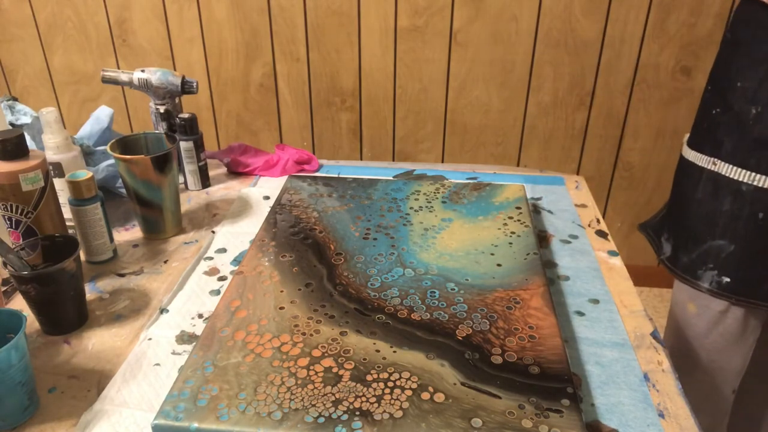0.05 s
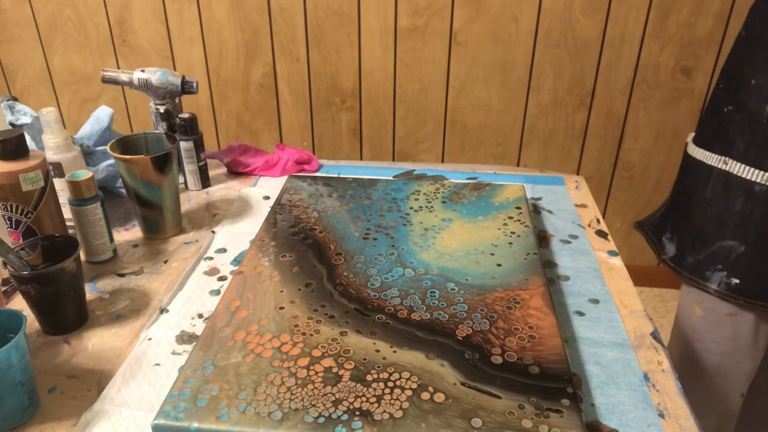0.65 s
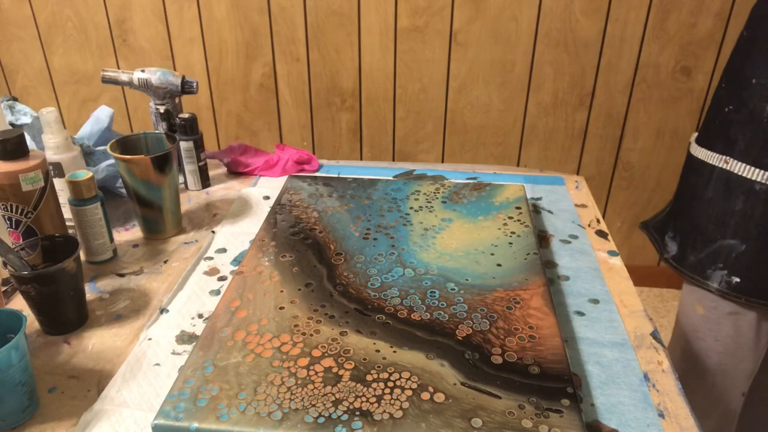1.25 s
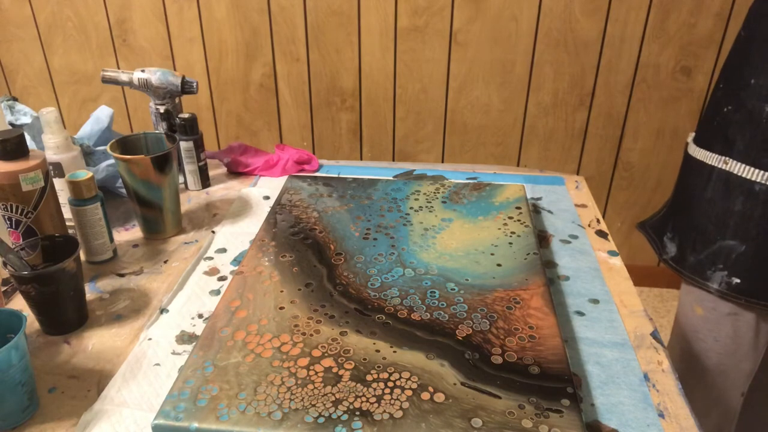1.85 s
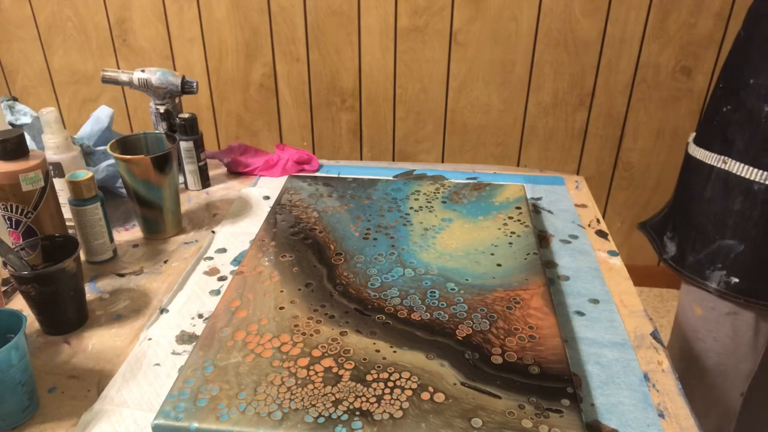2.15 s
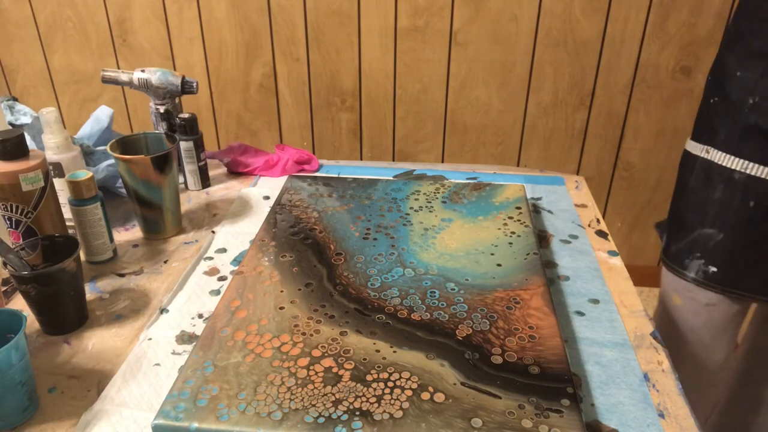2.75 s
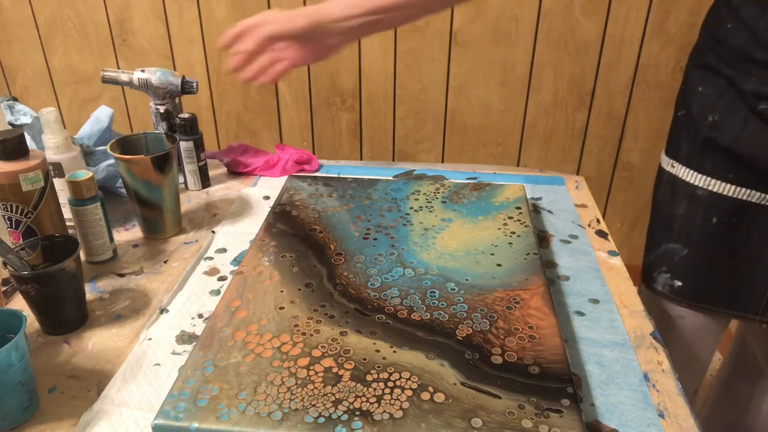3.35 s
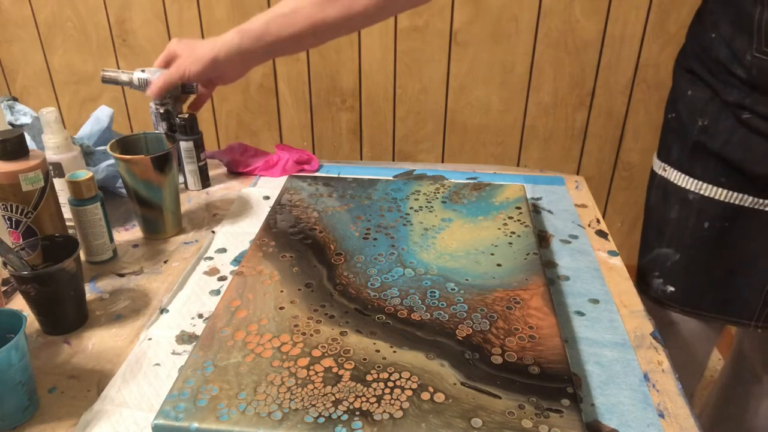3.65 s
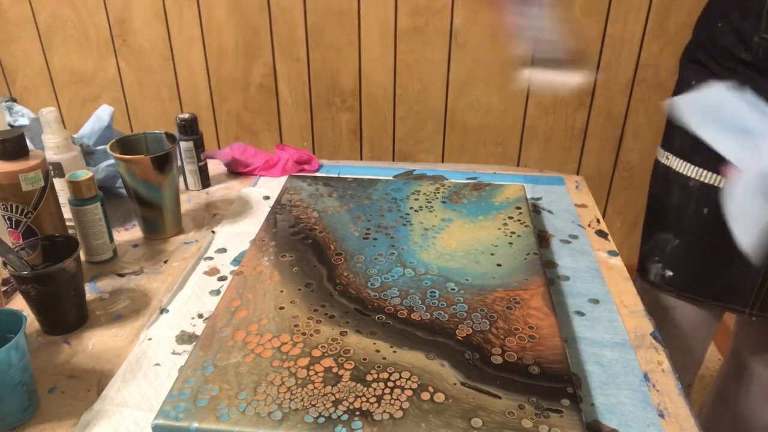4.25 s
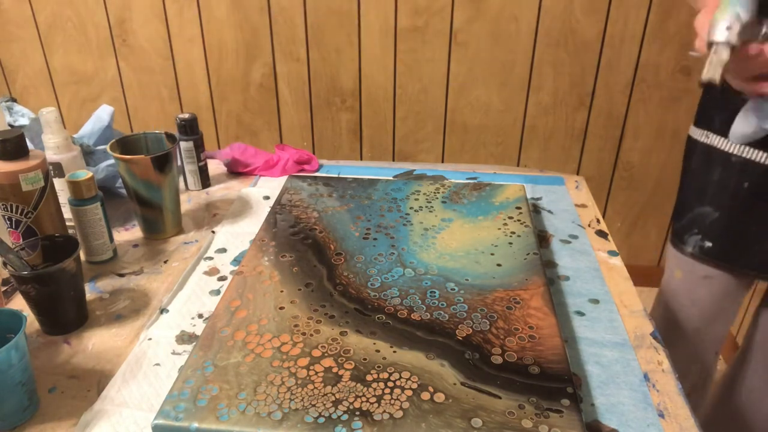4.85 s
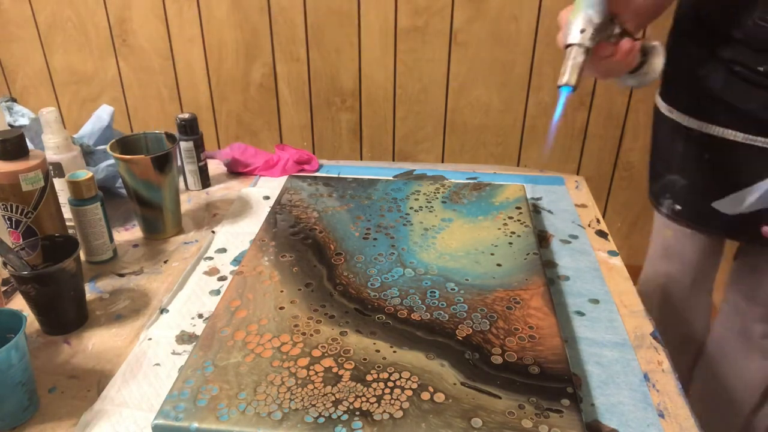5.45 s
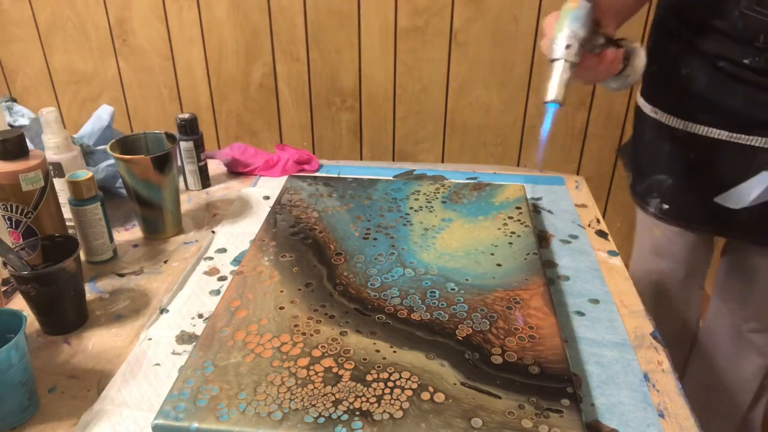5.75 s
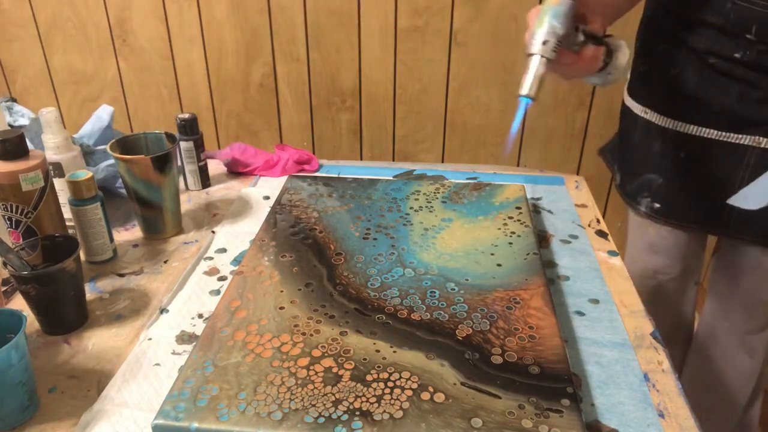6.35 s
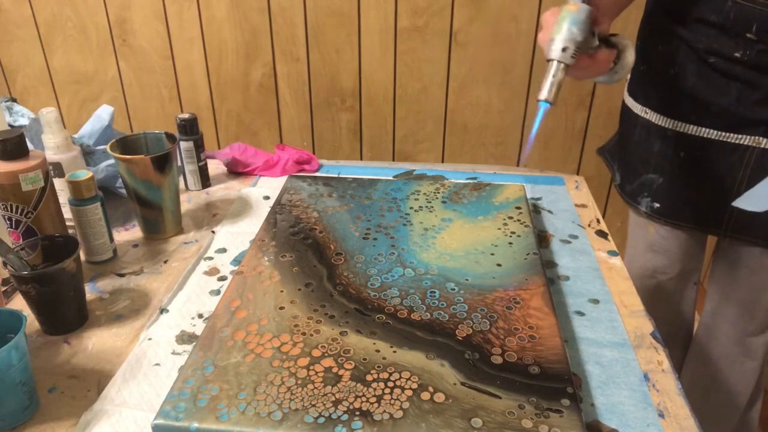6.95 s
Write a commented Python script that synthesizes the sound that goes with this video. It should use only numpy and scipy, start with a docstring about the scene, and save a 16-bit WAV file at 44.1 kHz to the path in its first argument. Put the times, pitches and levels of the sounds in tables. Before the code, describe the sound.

A gas torch lights with one sharp, very loud snap close to the microphone and keeps burning, a bright jet hiss over a low roar. Before that, the small workroom is quiet: hands are wiped on a cloth while a motor hums faintly, then come light knocks and a scrape as the torch is lifted, the click of its valve and a short hiss of unlit gas.

```python
"""A cloth swishes over hands in a small panelled workroom, with a motor humming underneath.
A butane torch is picked up with a scrape and light knocks. Its valve clicks open, cold gas hisses
through the nozzle, and the piezo igniter snaps hard enough to overload the microphone.
The flame catches and holds: a steady low roar of turbulent burning under a bright jet hiss,
whose treble shifts as the torch moves over the table."""
import sys
import numpy as np
from scipy import signal
from scipy.fft import rfft, irfft
from scipy.io import wavfile
from scipy.ndimage import uniform_filter1d

SR = 44100
rng = np.random.default_rng(int(sys.argv[2]) if len(sys.argv) > 2 else 0)


def dump(signal):
    """Clip the signal to [-1, 1] and save it as 16-bit WAV at the path in sys.argv[1]."""
    limited = np.clip(np.atleast_2d(signal).T, -1, 1)
    pcm = np.round(limited * 32767).astype(np.int16)
    wavfile.write(sys.argv[1], SR, pcm)


N = 312669
T, HZ = np.arange(N) / SR, np.fft.rfftfreq(N, 1 / SR)
LIT_S = 5.3867

# flame envelopes: (time [s], roar [dB], flame-front rasp before its trim [dB])
FLAME_LEVELS = [(5.5, -36, -45.5), (5.85, -34.5, -43.5), (6.2, -36, -46.5), (6.5, -37, -48),
                (6.8, -36, -46.5), (7.09, -35, -46.5)]
# turbulent combustion: (frequency [Hz], level [dB])
ROAR_SPECTRUM = [(50, -45), (110, -18), (240, -6), (290, 2), (500, -1), (1000, -1.5), (1140, -13.5),
                 (1500, -13.5), (2080, -15), (2300, -24.5), (3300, -23), (5000, -40)]
# peaks and notches that table and walls give the roar: (frequency [Hz], width [Hz], gain [dB])
ROAR_COLOUR = [(144, 42, 15.5), (561, 29, -16), (640, 45, 4), (752, 38, -5), (825, 53, 5), (1350, 51, -11),
               (1500, 90, 2.5), (3210, 110, 6)]
# bare jet noise: (frequency [Hz], level [dB])
JET_SPECTRUM = [(1200, 0.5), (2500, -4.5), (4000, -3.5), (9000, -2.5), (15800, -4.5)]
# nozzle resonances, lit and cold: (frequency [Hz], width [Hz], gain [dB])
HOT_NOZZLE_MODES = [(4830, 340, 8.5), (5340, 670, 10.5), (6360, 740, -1), (7670, 740, 7),
                    (10270, 1000, 5.5), (11900, 1140, -7), (13900, 1000, 10)]
COLD_NOZZLE_MODES = [(4580, 720, 22), (6150, 1300, 19), (10640, 600, 15.5), (11900, 900, -3),
                     (13800, 2200, 11)]
# top of the hiss as the nozzle swings on and off axis: (time [s], gain [dB])
NOZZLE_AIM = [(5.9, -2), (6.14, 1), (6.27, -5), (6.46, -8), (6.53, -1), (6.64, -.5), (6.72, -6.5),
              (6.96, -5.5), (7.08, -2)]
# phasing of the moving hiss: (time [s], signed comb depth [ratio])
COMB_DEPTH = [(5.6, .03), (6.0, 0.13), (6.3, -0.24), (6.6, 0.053), (7.09, 0.081)]
# igniter hammer and its rebounds: (time [s], level [dB], t60 [s], treble loss [dB/octave])
HAMMER_HITS = [(5.3869, 2, 0.019, -2), (5.3887, -3, 0.016, 5), (5.3909, -4.5, 0.022, -2)]
# bare impact: (frequency [Hz], level [dB])
IMPACT_SPECTRUM = [(40, -35), (130, -4), (400, -7.5), (900, -6.5), (2000, 1.5), (8000, 2), (11000, -1.5),
                   (16000, -2.5), (19000, -17)]
# heavily damped torch body: (frequency [Hz], width [Hz], gain [dB])
TORCH_MODES = [(1380, 400, 10), (2090, 720, 6), (2710, 340, 3.5), (3840, 1100, -5.5), (4630, 210, 8.5),
               (5200, 260, 5.5), (6300, 470, 4.5), (7090, 860, 12), (8230, 470, 6.5), (10100, 610, -3),
               (12840, 570, 11.5), (13800, 480, 19.5), (14700, 440, 10)]
# unlit gas: (time [s], valve seat hiss [dB], nozzle hiss [dB])
GAS_LEVELS = [(5.15, -57, -75), (5.2, -42.5, -54), (5.245, -39.5, -48), (5.29, -40, -43), (5.33, -49, -42),
              (5.39, -48, -41)]
# rasp at the valve seat: (frequency [Hz], level [dB])
SEAT_SPECTRUM = [(350, -37), (600, -10), (1170, -2), (2140, 0.5), (3020, 0), (3410, -3.5), (5140, -1),
                 (15800, -21)]
# the valve clicking open: (time [s], ring [dB], tick [dB])
OPENING_CLICKS = [(5.146, -38.5, -60), (5.155, -32, -29.5), (5.219, -55, -40)]
# resonance of the valve's tick: (frequency [Hz], width [Hz], gain [dB])
TICK_MODE = [(9400, 1000, 10)]
# scrape of the turning valve knob: (time [s], level [dB])
KNOB_LEVEL = [(4.93, -72), (5.01, -53.5), (5.06, -59), (5.12, -50.5), (5.16, -54), (5.2, -61)]
# fingers and table knocking the torch: (time [s], tick [dB], body [dB], body pitch [Hz], body t60 [s])
TORCH_KNOCKS = [(3.18, -66, -45, 400, .04), (3.782, -52, -46, 900, .02), (3.788, -51, -45, 3600, .014),
                (3.803, -48, -42.5, 1000, .017), (3.858, -53, -42, 3700, .008),
                (3.865, -45, -37.5, 3600, 0.0083), (4.376, -64, -47, 600, 0.069),
                (4.478, -50, -46, 5200, .06), (4.904, -40, -33, 2020, 0.035),
                (4.905, -48, -34.5, 3900, .018), (5.366, -63, -39, 450, 0.057)]
# cloth on the hands, later on the torch: (start [s], length [s], base level [dB], lightness [dB])
CLOTH_STROKES = [(0.035, 0.26, -49.5, -5.0), (0.28, 0.13, -46.5, -4.5), (0.4, 0.15, -54.5, -6),
                 (0.565, 0.16, -50, -6.0), (0.804, 0.17, -53.0, -4.5), (0.93, 0.16, -57.0, -5),
                 (1.128, 0.15, -51.5, -4.0), (1.285, 0.24, -48, -5.0), (1.522, 0.083, -55, -8),
                 (1.7, 0.17, -51.0, -4.5), (1.87, 0.24, -49.5, -3), (2.194, 0.2, -49, -3.0),
                 (2.339, 0.14, -47.5, -5.5), (2.535, 0.15, -46.0, -4.5), (2.7, 0.26, -49.5, -4.5),
                 (2.925, 0.3, -57.5, -6.5), (4.04, 0.32, -60.5, -4.5), (4.449, 0.21, -52, -6.5),
                 (4.7, 0.12, -56.5, -4.0), (4.83, 0.4, -52, -6.5)]
# swell in mid-stroke: (rub [dB], swish [dB], fizz [dB])
STROKE_SWELL = [0.3, 2, 0.5]
# sliding fibres: (frequency [Hz], level [dB])
CLOTH_SPECTRUM = [(150, -36), (300, -5.5), (660, -5), (1000, -3.5), (1200, -5), (1850, -2), (2400, -4.5),
                  (3600, -3.5), (4600, 0), (5600, -2.5), (7000, -6.5), (7700, -6.5), (11200, -12.5),
                  (15800, -12.5)]
# octave of the motor hum: (time [s], level [dB])
HUM_OCTAVE = [(0.1, -64.5), (0.72, -52), (1.12, -54.5), (1.6, -71), (2.2, -66), (2.32, -56.5), (3.1, -51.5),
              (3.45, -56.5), (4.48, -53.5), (4.85, -76)]
# still air of the room: (frequency [Hz], level [dB])
AIR_SPECTRUM = [(20, -36), (32, -17), (45, -10), (120, -11), (200, -9.5), (270, -9), (330, -13.5),
                (550, -17), (900, -21.5), (1500, -25.5), (4000, -32), (7800, -33), (9000, -38.5),
                (15800, -38)]
# low room resonances: (frequency [Hz], width [Hz], gain [dB])
AIR_MODES = [(54, 11, 9), (78, 8, 2), (108, 8, 0), (116, 8, 4.5), (145.4, 32, 8), (214.4, 14, 6.5),
             (235.4, 36, 2.5)]
# reverb decay: (frequency [Hz], t60 [s])
REVERB_T60 = [(150, 0.66), (1000, 0.75), (2500, 0.7), (7000, 0.54), (11000, 0.36), (16000, 0.41)]


def flame(rasp_trim_db=-1, hiss_db=-45, top_db=-50.5, catch_s=0.072, comb_delay_s=0.000478):
    """Turbulent burning roars low; the jet hisses through the hot nozzle, which beams its treble."""
    roar_db, rasp_db = curves(FLAME_LEVELS)
    aim_db, = curves(NOZZLE_AIM)
    flutter_db = 0.5 * wander(rate_hz=53)
    burning = noise(spectrum(ROAR_SPECTRUM) + resonances(ROAR_COLOUR))
    front = irfft(rfft(burning) * above(1190), N)
    roar = (burning - front) * amp(roar_db + flutter_db) * ramp(LIT_S, catch_s)
    rasp = ripple(front, depth_db=-3, drift_hz=0.13) * amp(rasp_db + rasp_trim_db + flutter_db)
    jet = noise(spectrum(JET_SPECTRUM) + resonances(HOT_NOZZLE_MODES))
    jet = ripple(jet, depth_db=-8, drift_hz=0.31)
    top = irfft(rfft(jet) * above(8360), N)
    hiss = rasp + unit(jet - top) * amp(hiss_db + 0.3 * aim_db) + unit(top) * amp(top_db + aim_db)
    phasing = curves(COMB_DEPTH)[0] * np.roll(hiss, round(comb_delay_s * SR))
    return (roar + hiss + phasing) * ramp(LIT_S, 0.027)


def igniter(pop_db=-27):
    """A sprung hammer hits the piezo crystal and rattles the torch; the gas catches with a soft pop."""
    direct, send = np.zeros(N), np.zeros(N)
    body = resonances(TORCH_MODES)
    for s, db, t60, treble_loss in HAMMER_HITS:
        blow = spectrum(IMPACT_SPECTRUM) - treble_loss * np.log2(1 + HZ / 2000)
        add(direct, s, amp(db) * burst(blow + body, t60))
        # the room gathers sound from all directions, which evens out the resonances
        add(send, s, amp(db) * burst(blow + 0.48 * body, t60))
    add(direct, LIT_S, amp(pop_db) * burst(band(hz=140, width_hz=80), t60=0.12))
    return direct + reverb(send, early_db=-9.5, early_t60=0.099, tail_db=-11.5)


def cold_gas():
    """Gas first rasps at the barely open valve seat, then sounds the cold nozzle until it is lit."""
    seat_db, nozzle_db = curves(GAS_LEVELS)
    seat = amp(seat_db) * noise(spectrum(SEAT_SPECTRUM))
    nozzle = amp(nozzle_db) * noise(spectrum(JET_SPECTRUM) + resonances(COLD_NOZZLE_MODES))
    return (seat + nozzle) * ramp(5.14, 0.02) * (1 - ramp(LIT_S, 0.022))


def handling(lift_s=3.775, lift_db=-54.5):
    """The torch scrapes its neighbours on the way up and takes knocks; its valve scrapes and clicks."""
    foley, tick = np.zeros(N), spectrum(IMPACT_SPECTRUM)
    for s, tick_db, body_db, hz, t60 in TORCH_KNOCKS:
        body = band(hz, width_hz=780 + 0.44 * hz)
        add(foley, s, amp(tick_db) * burst(tick, t60=0.022) + amp(body_db) * burst(body, t60))
    for s, ring_db, tick_db in OPENING_CLICKS:
        add(foley, s, amp(ring_db) * burst(band(hz=1230, width_hz=460), t60=0.047))
        add(foley, s, amp(tick_db) * burst(tick + resonances(TICK_MODE), t60=0.022))
    knob = scrape(hz=1200, width_hz=650, judder_db=4) * amp(curves(KNOB_LEVEL)[0])
    foley += knob * ramp(4.92, 0.02) * (1 - ramp(5.2, 0.02))
    lift = scrape(hz=3600, width_hz=3800, judder_db=2.5) * amp(lift_db)
    foley += lift * ramp(lift_s, 0.008) * (1 - ramp(lift_s, 0.105))
    return foley + reverb(foley, early_db=-5.5, early_t60=0.093, tail_db=-9)


def cloth(snags_per_s=700, snag_db=-12, rustle_db=-66.5, usual_lightness_db=-5):
    """Countless fibres slip under each stroke, a few snag; light strokes trade dull rub for fizz."""
    snags = (rng.random(N) < snags_per_s / SR) * rng.standard_normal(N)
    snags *= amp(2 * np.minimum(rng.exponential(1, N), 4))
    fibres = ripple(rng.standard_normal(N), depth_db=-12.5, drift_hz=0.398)
    slips = rfft(fibres + amp(snag_db) * unit(snags)) * amp(spectrum(CLOTH_SPECTRUM))
    middle, top = above(2870), above(9000)
    layers = np.array([unit(irfft(slips * share, N)) for share in (1 - middle, middle - top, top)])
    balance_db = np.array([-3, -0.33, 1.6])  # rub, swish, fizz
    rustle = amp(rustle_db) * (1 - ramp(5.18, 0.05))  # clothes stir faintly between the strokes
    power = np.outer(amp(balance_db + [0, 0, usual_lightness_db]), rustle) ** 2
    for start, length, db, lightness_db in CLOTH_STROKES:
        rub_loss_db = 1.6 * (lightness_db - usual_lightness_db)
        gains = amp(db + balance_db + [-rub_loss_db, 0, lightness_db])
        power += (gains[:, None] * stroke(start, length)) ** 2
    return (np.sqrt(power) * layers).sum(0) * amp(0.7 * wander(rate_hz=30))


def stroke(start, length, fade_s=0.054):
    """Envelopes of rub, swish and fizz: the hand gathers speed, peaks in mid-stroke and slows."""
    attack = (1 + np.tanh((T - start) / fade_s)) / 2
    release = (1 + np.tanh((start + length - T) / fade_s)) / 2
    arch = np.sin(np.pi * ramp(start, length)) - 2 / np.pi
    return attack * release * amp(np.outer(STROKE_SWELL, arch))


def motor(hum_hz=95.8, hum_db=-53.5, fade_db_per_s=1.46, beat_s=2.28, dip_s=1.68):
    """A hum wavers in pitch; its fundamental beats slowly and fades while the octave comes and goes."""
    phase = 2 * np.pi * np.cumsum(hum_hz * (1 + 0.0028 * wander(rate_hz=1.3))) / SR
    beat = 1 - 0.82 * np.cos(np.pi * (T - dip_s) / beat_s) ** 2
    fundamental = amp(hum_db - fade_db_per_s * T) * beat * unit(np.sin(phase))
    return fundamental + amp(curves(HUM_OCTAVE)[0]) * unit(np.sin(2 * phase))


def room_tone(level_db=-52):
    """A bed of still air, coloured by the room's low resonances."""
    return amp(level_db) * noise(spectrum(AIR_SPECTRUM) + resonances(AIR_MODES))


def reverb(x, early_db, early_t60, tail_db):
    """Reflections alone: quick scatter off the table, then a diffuse tail whose treble dies first."""
    t = np.arange(SR * 3 // 4) / SR
    hz, s, frames = signal.stft(rng.standard_normal(len(t)), SR, nperseg=256)
    decay = amp(-60 * s / spectrum(REVERB_T60, hz)[:, None])
    tail = signal.istft(frames * decay, SR, nperseg=256)[1][:len(t)]
    tail *= np.clip(t / 0.0038, 0, 1)
    early = rng.standard_normal(len(t)) * amp(-60 * t / early_t60)
    early *= (t > 0.002) * (rng.random(len(t)) < 0.08)  # sparse echoes after a pre-delay
    response = amp(early_db) * early / np.linalg.norm(early) + amp(tail_db) * tail / np.linalg.norm(tail)
    return signal.fftconvolve(x, response)[:N]


def ripple(x, depth_db, drift_hz):
    """Reflections cut fine peaks and dips into a steady sound; they shift as the source moves."""
    a, b = (reverb(x, early_db=depth_db, early_t60=0.08, tail_db=depth_db - 6) for _ in range(2))
    turn = 2 * np.pi * drift_hz * T
    return unit(x + np.cos(turn) * a + np.sin(turn) * b)


def burst(colour_db, t60, size=8192):
    """A fast-dying rattle of contacts rings a body with the given spectrum; it starts near rms 1."""
    decay = amp(-60 * np.arange(size) / SR / t60)
    rattle = np.fft.fft(rng.standard_normal(size) * decay)
    colour = amp(np.interp(abs(np.fft.fftfreq(size, 1 / SR)), HZ, np.maximum(colour_db, -80)))
    log_gain = np.log(colour / uniform_filter1d(abs(rattle), size=15, mode="wrap"))
    body = np.exp(np.conj(signal.hilbert(log_gain)))  # minimum phase: rings only after each contact
    hit = np.fft.ifft(rattle * body).real * np.linspace(1, 0, size)
    return unit(hit) * np.sqrt(np.mean(decay ** 2))


def scrape(hz, width_hz, judder_db):
    """Stick and slip excite one broad resonance unevenly."""
    return noise(band(hz, width_hz)) * amp(judder_db * wander(rate_hz=77))


def noise(colour_db):
    """Noise of rms 1 with the given spectrum."""
    return unit(irfft(rfft(rng.standard_normal(N)) * amp(colour_db), N))


def wander(rate_hz):
    """Smooth random modulation of rms 1."""
    return unit(irfft(rfft(rng.standard_normal(N)) / (1 + (HZ / rate_hz) ** 4), N))


def band(hz, width_hz):
    """One resonance with steep skirts, in dB over frequency."""
    offset = (HZ - hz) / width_hz
    return -20 * np.log10(1 + 2 * offset ** 2 + (2 * offset) ** 4 / 2)


def resonances(rows):
    """Bell-shaped peaks and notches, in dB over frequency."""
    return sum(db * 0.5 ** ((2 * (HZ - hz) / width) ** 2) for hz, width, db in rows)


def above(hz):
    """High side of a soft crossover, as gain over frequency."""
    return 1 / (1 + (hz / (HZ + 1)) ** 12)


def spectrum(points, hz=HZ):
    """Reads a table on a log-frequency axis."""
    f, value = np.transpose(points)
    return np.interp(np.log(hz + 1), np.log(f + 1), value)


def curves(rows):
    """One automation curve for each column after the time."""
    s, *columns = np.transpose(rows)
    return [np.interp(T, s, c) for c in columns]


def ramp(start, length):
    """Linear fade from 0 to 1."""
    return np.clip((T - start) / length, 0, 1)


def amp(db):
    """Decibels to gain."""
    return 10 ** (np.asarray(db) / 20)


def unit(x):
    """Scales to rms 1."""
    return x / np.sqrt(np.mean(x ** 2) + 1e-20)


def add(mix, s, sound):
    """Drops a sound into the mix at time s."""
    part = mix[round(s * SR):][:len(sound)]
    part += sound[:len(part)]


def scene():
    """All layers in one mono mix."""
    return (room_tone() + motor() + cloth() + handling() + cold_gas() + igniter() + flame())[None]


def record(dry, low_cut_hz=30, high_cut_hz=15870):
    """The microphone sheds the deepest bass, the snap clips the input, and a steep high cut follows."""
    low_cut = signal.butter(2, low_cut_hz, "highpass", fs=SR, output="sos")
    clipped = np.clip(signal.sosfilt(low_cut, dry), -1, 1)
    high_cut = signal.firwin(511, high_cut_hz, window=("kaiser", 9), fs=SR)
    return signal.oaconvolve(clipped, high_cut[None], "same")


dry = scene()
out = record(dry)
dump(out)
```